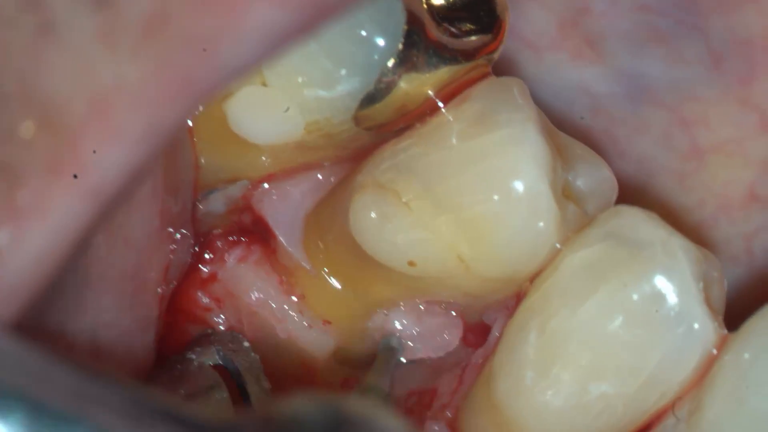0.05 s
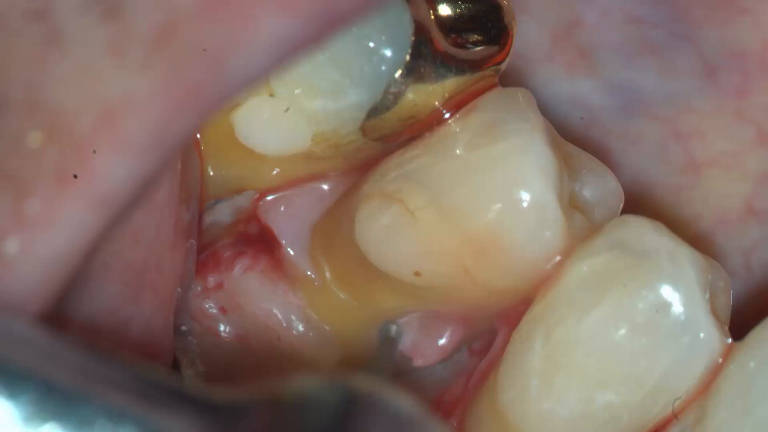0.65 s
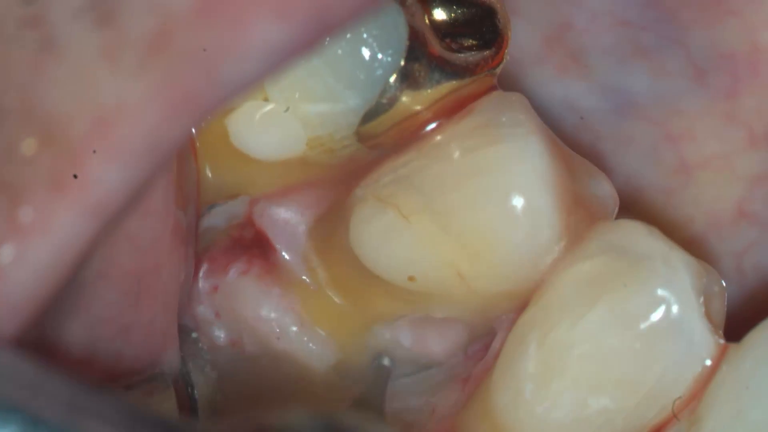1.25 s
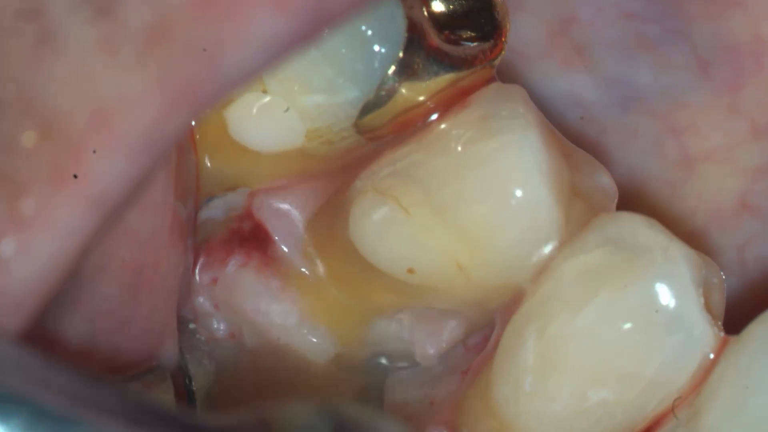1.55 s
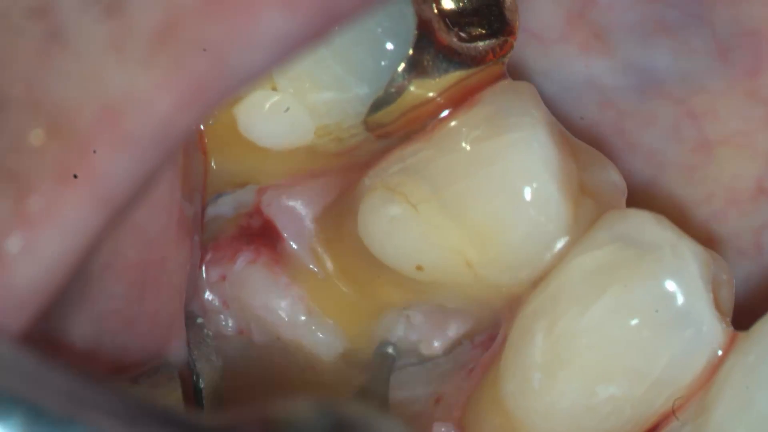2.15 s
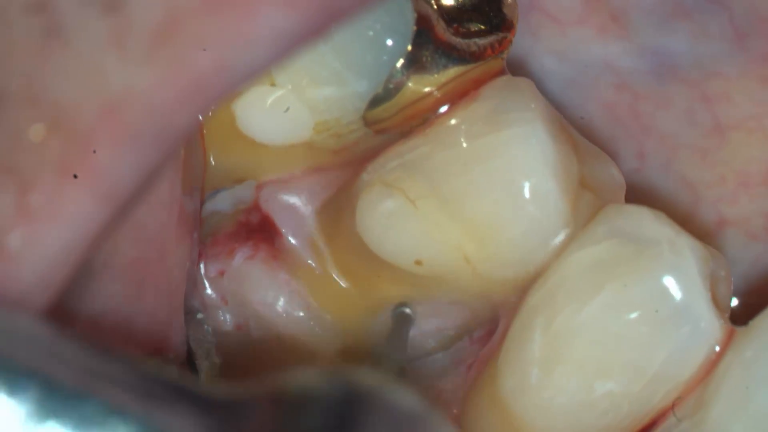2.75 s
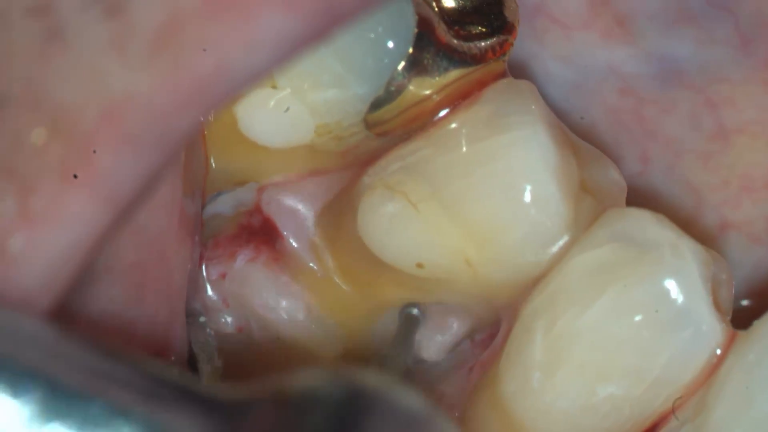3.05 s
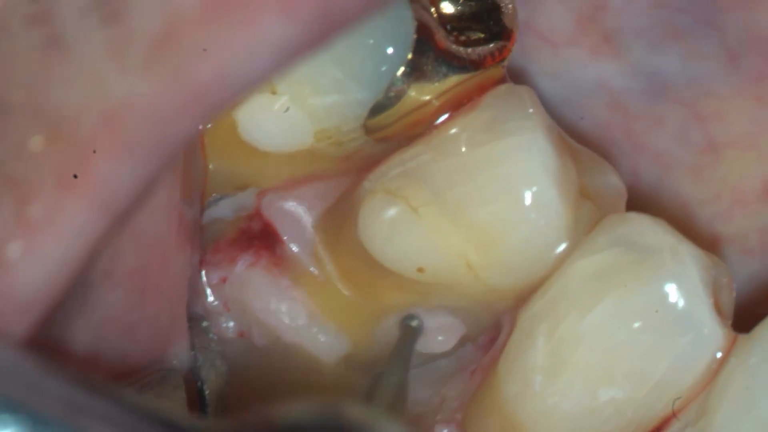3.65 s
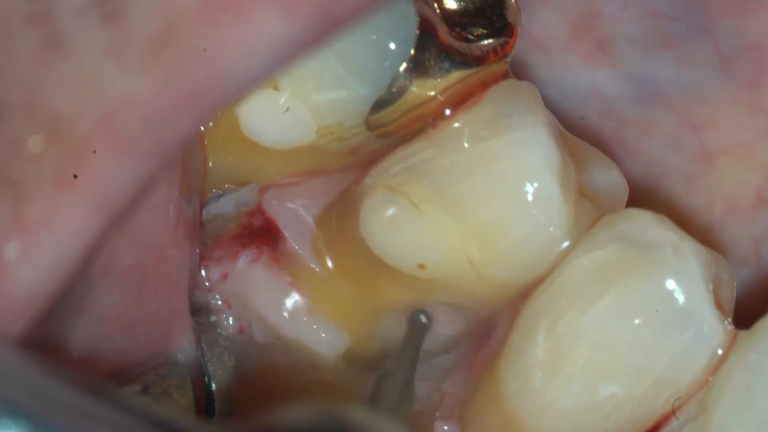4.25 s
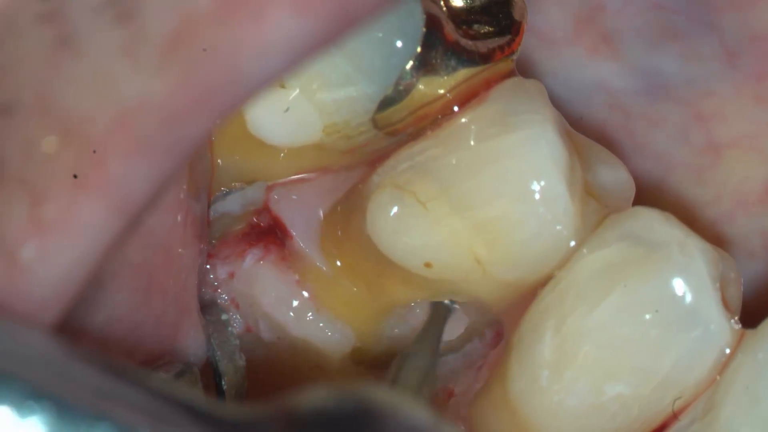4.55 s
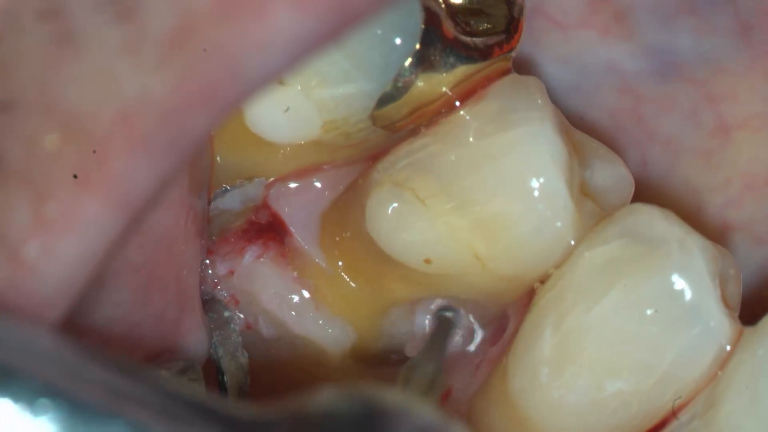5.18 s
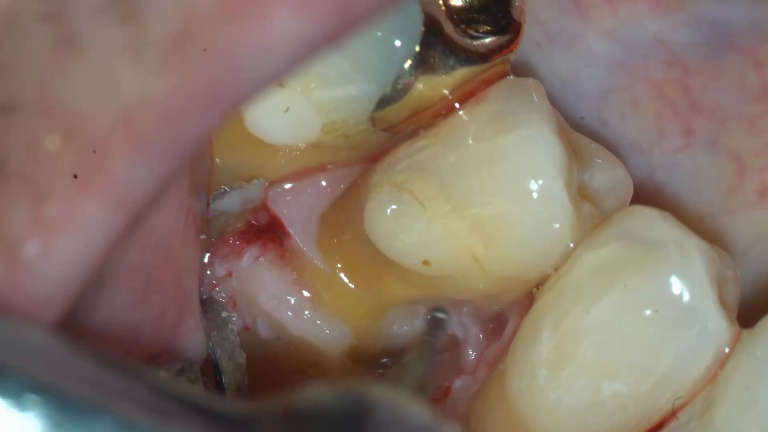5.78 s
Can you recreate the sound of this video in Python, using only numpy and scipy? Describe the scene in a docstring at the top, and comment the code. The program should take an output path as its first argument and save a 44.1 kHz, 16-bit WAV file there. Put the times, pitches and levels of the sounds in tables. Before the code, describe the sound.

A bright, steady hiss of dental suction and cooling spray fills an open mouth, heard close up. The thin, high whine of a dental drill climbs out of it, sags slowly under load, then coasts down. The hiss dips briefly and gurgles lightly now and then. Near the end, air whistles over the suction tip. A faint machine hum lies beneath.

```python
"""A steady hiss of suction and cooling spray fills an open mouth, and a thin whine climbs out of it.
The whine is a dental air turbine: it spins up, sags under the load on its bur and coasts down,
its strength following its speed. The hiss lulls now and then and gurgles in the mouth's cavities;
late on, air whistles over the rim of the suction tip. A little machine hum and room air lie beneath."""
import sys
import numpy as np
from scipy.fft import rfft, irfft
from scipy.io import wavfile
from scipy.ndimage import uniform_filter1d

SR = 44100
rng = np.random.default_rng(int(sys.argv[2]) if len(sys.argv) > 2 else 0)


def unload_wav(signal):
    """Save mono or channel-first audio to the path in sys.argv[1] as 16-bit WAV at rate SR, clipped to [-1, 1]."""
    wavfile.write(
        sys.argv[1],
        SR,
        np.round(np.clip(np.atleast_2d(signal).T, -1, 1) * 32767).astype(np.int16),
    )


N = 256662
TIME = np.arange(N) / SR
HZ = np.maximum(np.arange(N // 2 + 1) * SR / N, 1)
SIDES = np.array([[.5], [-.5]])   # splits a level or phase offset between left and right
CUTOFF_HZ = 15740


def from_db(db):
    """Decibels to gain."""
    return 10 ** (np.asarray(db) / 20)


def rms_one(x):
    """Scale to rms 1."""
    return x / np.sqrt(np.mean(x ** 2) + 1e-20)


def in_time(rows):
    """Each column of an automation curve at every sample."""
    seconds, *columns = np.transpose(rows)
    return [np.interp(TIME, seconds, column) for column in columns]


def at_hz(rows, hz):
    """Each column of a frequency curve at the given frequencies."""
    points, *columns = np.transpose(rows)
    return [np.interp(np.log(hz), np.log(points), column) for column in columns]


def pan(left_db):
    """Left and right gains of unit mean power."""
    gains = from_db(SIDES * left_db)
    return gains / np.sqrt(np.mean(gains ** 2, axis=0))


def white():
    """Spectrum of fresh white noise."""
    return rfft(rng.standard_normal(N))


def drift(rate_hz):
    """Random modulation of rms 1, rolling off above the given rate."""
    return rms_one(irfft(white() / (1 + (HZ / rate_hz) ** 2), N))


def bell(hz, width_hz, at=HZ):
    """Power response of one resonance, 1 on top."""
    return 1 / (1 + (2 * (at - hz) / width_hz) ** 2)


def swells(rows):
    """Sum of rounded bumps, one for each event, in dB."""
    return sum(db * np.exp(-(2 * (TIME - centre) / length) ** 2) for centre, length, db in rows)


# The slap off a nearby surface: delay in seconds on the left, then on the right.
SLAP_DELAYS = [6.66e-3, 6.8e-3]

def surroundings(x, echo_db=-18, scatter_db=-12, t60=0.21, corner_hz=1500):
    """One near echo and a short scatter off small things ripple the treble; gliding tones swell and fade."""
    echo = from_db(echo_db) * np.exp(-2j * np.pi * np.outer(SLAP_DELAYS, HZ))
    tail = rng.standard_normal((2, N)) * from_db(-60 * np.minimum(TIME / t60, 4))
    scatter = rms_one(tail) / np.sqrt(N)   # unit energy
    response = 1 + echo + from_db(scatter_db) * rfft(scatter) * HZ / (HZ + corner_hz)
    return irfft(rfft(x) * response, N)


# The bed of pump and mains tones. Each row: pitch in Hz, resting level in dB.
HUM_TONES = [(60, -62.5), (119.5, -58), (270, -60), (371, -60.5), (1060, -53.5), (1147, -64)]

def machine_hum(waver_db=1.5, wander_rad=1.0, follows=1.3):
    """Pump and mains tones waver on their way through the room, rising and sinking with the room air."""
    tones = np.zeros(N)
    for hz, level_db in HUM_TONES:
        gain = from_db(level_db + waver_db * drift(4.0))
        tones += gain * np.sin(2 * np.pi * hz * TIME + wander_rad * drift(2.0))
    room_db = in_time(HISS_FADERS)[0]
    return np.sqrt(2) * from_db(follows * (room_db - room_db.mean())) * tones * pan(1.2)


# The broad EQ of rushing air. Each row: frequency in Hz, relative level in dB.
AIR_EQ = [(40, -13), (200, -15), (500, -12), (850, -18.5), (1100, -16.5), (1600, -12.5), (2500, -9.5),
          (3900, -13.5), (4400, -1), (6000, -5.5), (6800, -3), (9200, -1.5), (12500, -4), (15500, -8.5)]
# Resonances of mouth, tip and tube. Each row: centre in Hz, width in Hz, lift in dB.
CAVITY_PEAKS = [(280, 40, 1.8), (366, 40, 2.0), (797, 160, 3.3), (947, 40, 4.2), (1098, 400, 9.0),
                (1163, 40, 2.6), (1701, 80, 2.3), (2046, 160, 1.4), (2950, 160, 5.6), (3144, 400, 2.1),
                (3639, 400, 8.6), (3919, 80, 7.2), (4910, 40, 4.0), (5039, 80, 4.6), (5190, 40, 4.2),
                (5362, 80, 2.4), (5642, 40, 4.6), (5728, 400, 2.6), (5986, 160, 3.8), (8484, 40, 4.3),
                (8872, 400, 3.0), (11262, 400, 3.7), (11628, 80, 2.8), (12489, 400, 1.8)]
# The air's stereo image. Each row: frequency in Hz, left over right in dB, shared power from 0 to 1,
# left phase lead in radians.
AIR_IMAGE = [(100, 1.9, 0.04, -0.6), (700, 2.7, 0.14, -1.0), (1100, 1.9, 0.55, -0.0),
             (1500, 1.5, 0.29, -3.5), (2100, 1.6, 0.21, 0.3), (2900, 3.3, 0.38, 1.4), (3600, 1.9, 0.3, 0.2),
             (4150, 1.8, 0.22, -4.4), (4700, 3.8, 0.5, 0.4), (5800, -0.7, 0.55, 0.6),
             (6600, -2.8, 0.19, 1.5), (7500, -1.6, 0.49, -3.6), (8400, 2.0, 0.53, -2.2),
             (9200, 3.6, 0.65, -3.7), (10400, 4.7, 0.5, -3.2), (11400, 7.6, 0.6, -3.5),
             (12400, 3.6, 0.59, -3.9), (13200, 1.9, 0.57, -3.7), (14800, 1.0, 0.42, -2.8)]

def rushing_air():
    """Stereo spectrum of turbulence heard through the cavities, partly shared by left and right."""
    cavity_db = sum(lift_db * bell(hz, width) for hz, width, lift_db in CAVITY_PEAKS)
    colour_db = at_hz(AIR_EQ, HZ)[0] + cavity_db
    left_db, alike, lead = at_hz(AIR_IMAGE, HZ)
    shared = np.sqrt(alike) * white() * np.exp(1j * SIDES * lead)
    separate = np.sqrt(1 - alike) * np.array([white(), white()])
    return from_db(colour_db) * pan(left_db) * (shared + separate)


# Slow fader rides on the five hiss bands. Each row: time in seconds, then the base levels in dB of
# room air, mouth cavity, wet slurp, suction jet and fine spray.
HISS_FADERS = [(0, -42, -43, -35, -26, -24.8), (.7, -43, -42, -35, -27, -24),
               (1.05, -43.5, -39.5, -34, -27, -25), (2.0, -43.5, -38.5, -35.5, -27, -24.5),
               (2.9, -44.5, -40.5, -36.5, -27.5, -26), (3.8, -45.5, -42.5, -37, -28.5, -26),
               (4.0, -44, -39, -35.5, -27, -26), (4.55, -43, -40.5, -35.5, -27, -24.5),
               (5.82, -43.5, -44, -36, -27, -24.5)]
# Brief dips in the hiss. Each row: centre in seconds, length in seconds, depth at the jet in dB.
HISS_DIPS = [(.56, .04, 2), (.75, 0.09, 3), (2.1, .1, 2), (2.41, 0.09, 1), (2.65, 0.033, 2),
             (2.8, 0.091, 2.2), (3.01, 0.096, 2.5), (3.49, 0.04, 3), (3.86, .08, 0)]
# Water gurgles into the tip and the mouth rings. Each row: centre in seconds, length in seconds,
# jet lift in dB, mouth ring lift in dB.
WATER_GURGLES = [(0.272, 0.12, 0.5, 3.5), (0.533, .04, 1, 5), (1.056, .07, 0.5, 4), (1.182, 0.046, -1, 4),
                 (1.346, .06, 1.2, 3), (1.957, .11, 1, 2), (2.3, .08, 0.8, 1), (2.536, 0.076, 2, -3),
                 (2.598, .05, 1.5, 7.5), (2.71, 0.03, 1.5, 3), (2.907, 0.11, 0.5, 3.5),
                 (3.115, 0.065, -1, 4), (4.07, 0.13, 1.6, 0.5)]

def suction_hiss(gurgle_db=1.1, flutter_db=0.9, spray_flutter_db=0.5):
    """Room air, mouth, slurp, jet and spray each fill a band; passing water flutters the upper four."""
    air, water = rushing_air(), drift(28)
    lull_db = swells(HISS_DIPS)
    surge_db = swells((centre, length, db) for centre, length, db, _ in WATER_GURGLES) - lull_db
    ring_db = swells((centre, length, db) for centre, length, _, db in WATER_GURGLES)
    room_db, mouth_db, slurp_db, jet_db, spray_db = in_time(HISS_FADERS)
    edges_hz = [15, 850, 1400, 4100, 7200, CUTOFF_HZ + 500]
    levels_db = [room_db + 0.82 * surge_db,
                 mouth_db + ring_db - 1.2 * lull_db + gurgle_db * drift(25),
                 slurp_db + 0.95 * surge_db + flutter_db * water,
                 jet_db + surge_db + flutter_db * water,
                 spray_db + surge_db + spray_flutter_db * drift(27)]
    out = np.zeros((2, N))
    for low, high, level_db in zip(edges_hz, edges_hz[1:], levels_db):
        band = irfft(air * ((HZ >= low) & (HZ < high)), N)
        out += from_db(level_db) * band / np.std(band.mean(axis=0))
    return out


# Breathy edge tones at the suction tip. Each row: start in seconds, end in seconds, pitch in Hz,
# nominal width in Hz, level in dB, left over right in dB.
EDGE_TONES = [(4.282, 4.597, 3960, 90, -38, 8), (4.603, 5.41, 4217, 105, -32, 14),
              (4.62, 5.5, 6430, 220, -36.5, -2), (5.38, 5.617, 4620, 200, -34, 6),
              (5.45, 5.82, 4150, 160, -37, 13), (5.614, 5.79, 3040, 70, -36.5, 17)]

def tip_whistles(fade_s=0.039):
    """Air over the rim of the suction tip sings in narrow, unsteady bands."""
    out = np.zeros((2, N))
    for start, end, hz, width_hz, level_db, left_db in EDGE_TONES:
        gate = np.clip(np.minimum(TIME - start, end - TIME) / fade_s + .5, 0, 1)
        whistle = rms_one(irfft(white() * bell(hz, 0.96 * width_hz), N))
        out += from_db(level_db) * pan(left_db) * gate * whistle
    return out


# The rotor's climb and sag while air drives it. Each row: time in seconds, speed in turns per second.
DRIVEN_SPEED = [(0, 1620), (.15, 2059), (.45, 2695), (.56, 3130), (.89, 5300), (1.0, 5750), (1.15, 6165),
                (1.3, 6310), (1.7, 5570), (1.8, 5290), (2.02, 5048), (2.08, 4875), (2.32, 4771),
                (2.45, 4586), (2.68, 4548), (2.8, 4458), (3.1, 4395), (3.42, 4400), (3.56, 4245),
                (3.76, 4282), (4.19, 3915), (4.3, 3674)]

def rotor_speed(idle_hz=1010, coast_s=.8, inertia_s=.025):
    """Turns per second: driven at first, then coasting down exponentially; inertia rounds every change."""
    coasting_s = np.maximum(TIME - DRIVEN_SPEED[-1][0], 0)
    speed = idle_hz + (in_time(DRIVEN_SPEED)[0] - idle_hz) * np.exp(-coasting_s / coast_s)
    return uniform_filter1d(speed, int(inertia_s * SR) + 1, mode="nearest")


# Resonances and gaps that flare and fade the shaft tone as it sweeps through them.
# Each row: centre and width in turns per second, lift in dB.
SHAFT_FLARES = [(1628, 66, 13.5), (2250, 160, 3), (3060, 150, 7), (3550, 430, -5), (4190, 260, 9),
                (4560, 700, -6.5)]
# The whine's bright edge, its third harmonic. Each row: speed in turns per second,
# level under full drive in dB, left phase lead in radians.
THIRD_HARMONIC = [(2500, -57, 3.7), (3450, -30, 2.4), (4210, -20.5, 2.16), (4520, -21.5, 3.0),
                  (4570, -21, 1.1), (4610, -22, 2.7), (4950, -25.5, 2.5), (5500, -31, 1.0),
                  (6300, -28, 0.9)]

def turbine_whine(wobble=0.00041, rattle=0.00877, smooth_hz=4300, waver_db=3.0, step_hz=48000):
    """Shaft tone, third harmonic and bearing cage follow the rotor, wavering as the drill head moves."""
    speed = rotor_speed()
    shaft_db = -29 + 13.5 * np.log2(speed / 5960)   # grows 13.5 dB per octave of speed
    shaft_db += sum(lift_db * bell(hz, width, speed) for hz, width, lift_db in SHAFT_FLARES)
    third_db, third_lead = at_hz(THIRD_HARMONIC, speed)
    third_db -= 7 * np.clip((TIME - 3.77) / 0.22, 0, 1)   # fades as the drive air is eased off
    # below its running speed the rotor chatters in its bearings and the tone roughens
    chatter = np.clip(5 * (1 - speed / smooth_hz), 0, 1)
    speed = speed * (1 + wobble * drift(49.4) + rattle * chatter * drift(120))
    # tiny timing steps put side tones around each partial
    lag_s = (TIME * step_hz % 1) / step_hz
    angle = 2 * np.pi * (np.cumsum(speed) / SR - speed * lag_s)

    def partial(multiple, level_db, left_db, lead_rad):
        """One tone of the rotor, wavering separately on the left and right."""
        waver = waver_db * np.array([drift(38), drift(29)])
        tone = np.sin(multiple * angle + SIDES * lead_rad)
        return np.sqrt(2) * from_db(level_db + waver) * pan(left_db) * tone

    shaft = partial(0.99, shaft_db, left_db=2.5, lead_rad=0.22)
    third = partial(3, third_db, left_db=1.5, lead_rad=third_lead)
    cage = partial(.391, level_db=-51, left_db=1.5, lead_rad=0)   # the ball cage turns slower
    return shaft + third + (1 - chatter) * cage


def scene():
    """Hiss, whine and whistles bounce off nearby things, over the hum."""
    return surroundings(suction_hiss() + turbine_whine() + tip_whistles()) + machine_hum()


def record(dry):
    """A steep high cut takes off the very top."""
    high_cut = np.clip((CUTOFF_HZ - HZ) / 60 + .5, 0, 1)
    return irfft(rfft(dry) * high_cut, N)


dry = scene()
out = record(dry)
unload_wav(out)
```